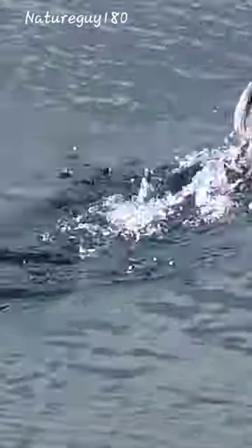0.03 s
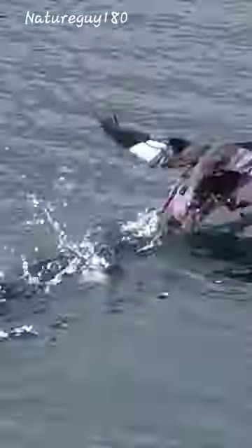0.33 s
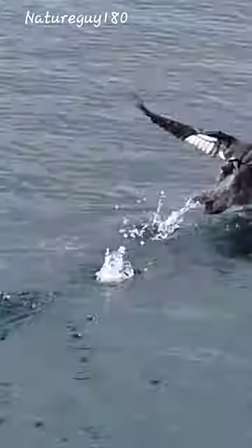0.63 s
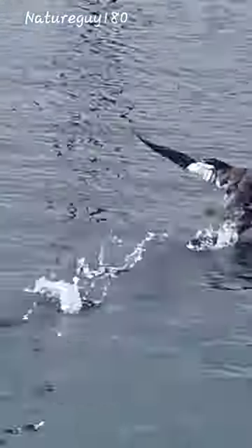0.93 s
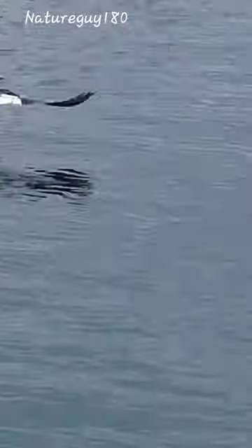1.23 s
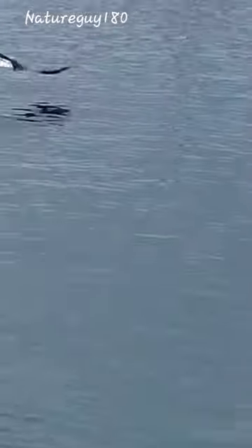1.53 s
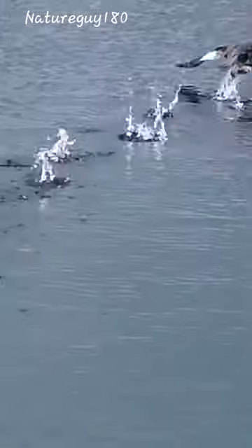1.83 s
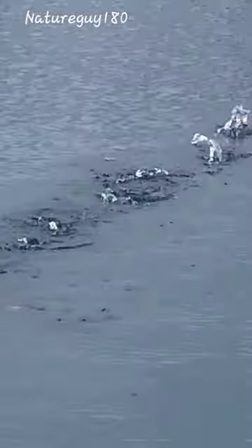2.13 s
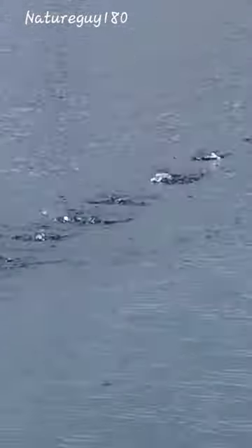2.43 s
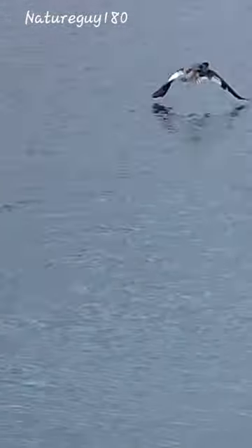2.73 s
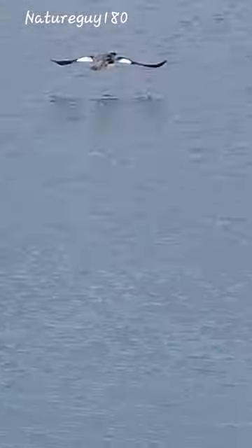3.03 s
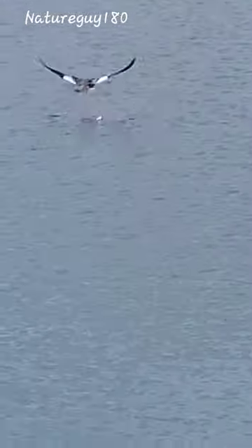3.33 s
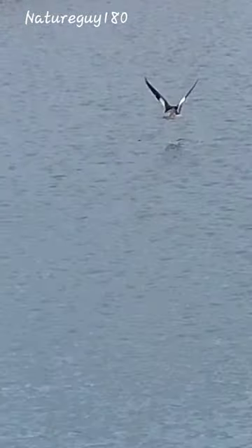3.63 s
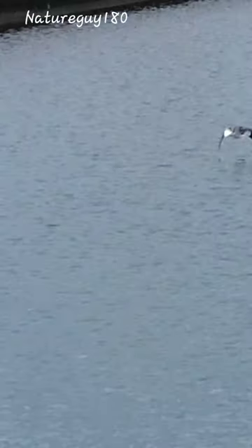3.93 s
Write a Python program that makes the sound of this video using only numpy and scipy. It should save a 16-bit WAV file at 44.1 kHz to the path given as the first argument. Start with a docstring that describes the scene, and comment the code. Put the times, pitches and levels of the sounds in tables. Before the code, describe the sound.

Sharp splashes of a duck running across water, fading, with light wind on the microphone.

```python
"""On a calm lake, a duck runs across the water to take off and fades as it flies away.
Its feet strike the surface in sharp cracks and plunge in, trapping air that rings as bubbles,
while spray patters down behind it. Far off, one whistling call, probably another water bird,
echoes from the banks. Turbulent wind buffets the microphone, mostly its right port,
over a distant rumble."""
import sys
import numpy as np
from scipy import signal
from scipy.fft import rfft, irfft, next_fast_len
from scipy.io import wavfile
from scipy.ndimage import uniform_filter1d, map_coordinates

SR = 44100
rng = np.random.default_rng(int(sys.argv[2]) if len(sys.argv) > 2 else 0)


def int16_out(signal):
    """Quantize to a 16-bit WAV file."""
    q = np.round(np.clip(np.atleast_2d(signal).T, -1, 1) * 32767)
    wavfile.write(sys.argv[1], SR, q.astype(np.int16))


N = 176400

# Spectrum of a sharp impact on water: frequency_hz, gain_db
IMPACT_SPECTRUM = [(1500, -18), (3000, 8), (5000, 5.5), (8000, 6), (9500, -15), (15500, -9)]
# Spectrum of spray and froth: frequency_hz, gain_db
SPRAY_SPECTRUM = [(300, 5.5), (800, 3), (1350, 4), (2000, 9), (3200, 1), (6000, -1), (7800, 0), (9200, -9),
                  (12000, -12), (15500, -9.5)]
# Left-right likeness of the splashes: frequency_hz, coherence
WATER_COHERENCE = [(500, 1), (4000, 0.19), (15000, 0.1)]
# Left-right likeness of sound from the shore: frequency_hz, coherence
SHORE_COHERENCE = [(200, 0.81), (700, 0.86)]


def amp(db):
    """Decibels to amplitude ratio."""
    return 10 ** (np.asarray(db) / 20)


def unit(x):
    """Normalisation to rms 1."""
    return x / np.sqrt(np.mean(x ** 2) + 1e-20)


def along(points, hz):
    """Interpolation of (frequency_hz, value) points on a logarithmic frequency axis."""
    knots_hz, values = np.transpose(points)
    return np.interp(np.log(hz + 1), np.log(knots_hz + 1), values)


def envelope(points):
    """Amplitude envelope through (time_s, level_db) points, linear in decibels."""
    time_s, level_db = np.transpose(points)
    return amp(np.interp(np.arange(N) / SR, time_s, level_db))


def wobble(knots_per_s):
    """Smooth random modulation: a spline through Gaussian values."""
    return map_coordinates(rng.standard_normal(4096), [np.arange(N) * knots_per_s / SR], mode="wrap")


def filtered(x, response):
    """Linear filtering: the spectrum is multiplied by a frequency response."""
    n = x.shape[-1]
    padded = next_fast_len(n + 4096)
    return irfft(rfft(x, padded) * response(np.fft.rfftfreq(padded, 1 / SR)), padded)[..., :n]


def coloured(x, spectrum):
    """Spectral shaping by (frequency_hz, gain_db) points, at rms 1."""
    return unit(filtered(x, lambda hz: amp(along(spectrum, hz))))


def noise(spectrum, samples=N):
    """Two independent channels of coloured Gaussian noise."""
    return coloured(rng.standard_normal((2, samples)), spectrum)


def spread(pair, coherence):
    """Mid-side mixing gives two independent signals a set left-right coherence."""
    angle = lambda hz: np.arccos(np.clip(along(coherence, hz), -1, 1)) / 2
    mid, side = filtered(pair, lambda hz: np.array([np.cos(angle(hz)), np.sin(angle(hz))]))
    return np.array([mid + side, mid - side])


def pan(left_over_right_db):
    """Constant-power panning by level difference."""
    return unit(amp(np.array([[left_over_right_db], [-left_over_right_db]]) / 2))


def add(track, start_s, sound):
    """Superposition of a sound on a track."""
    part = track[..., max(0, round(start_s * SR)):][..., :sound.shape[-1]]
    part += sound[..., :part.shape[-1]]


def background(hiss_db=-61):
    """Broadband noise: a largely coherent rumble from the far shore and a thin, incoherent hiss."""
    # Strength of the rumble: time_s, level_db
    shore_levels = [(1.4, -52.5), (1.8, -47.5), (2.5, -48.5), (3.35, -52.5)]
    # Spectra of the rumble and the hiss: frequency_hz, gain_db
    shore_spectrum = [(180, 2), (240, 7), (330, -2.5), (620, -1.5), (1200, -8.5), (1700, -19.5),
                      (6000, -88)]
    hiss_spectrum = [(4000, 0), (7800, -10), (9200, -20), (12500, -22), (15000, -15)]
    rumble = spread(noise(shore_spectrum), SHORE_COHERENCE)
    return envelope(shore_levels) * rumble + amp(hiss_db) * noise(hiss_spectrum)


def wind(sheltered_left_db=-15.5, breeze_body_db=-13, buffet_depth_db=3):
    """Turbulent pressure at the microphone: a breeze mostly on the right port, gusts on both."""
    # Strength of the breeze on the right port: time_s, level_db
    breeze_levels = [(0, -38.5), (1.46, -36.5), (1.85, -34), (2.3, -40), (2.55, -33), (3.24, -41),
                     (3.33, -34), (3.41, -43), (3.66, -34), (3.83, -34.5), (3.89, -46.5), (4, -31.5)]
    # Short gusts: time_s, nominal_length_s, relative_level_db, left_over_right_db, body_over_rumble_db
    gusts = [(0.546, 0.05, -27.5, 3.5, -13), (0.986, 0.085, -35, 4, -37), (2.003, 0.076, -38, 3, -9),
             (2.649, 0.086, -34, 2.5, -7), (2.754, 0.1, -33.5, -7, -6.5), (2.857, 0.065, -31.5, -4.5, -14),
             (3.139, 0.044, -35, -1, -8.5), (3.667, 0.042, -32.5, 1, -16)]
    # Spectra of the deep rumble and the body above it: frequency_hz, gain_db
    rumble_spectrum = [(20, -17), (62, 2), (100, -1), (250, -24.5), (1500, -92)]
    body_spectrum = [(60, -19), (140, 3), (240, 2.5), (350, -11), (1100, -27), (4000, -57)]
    gust_coherence = [(100, 0.49)]  # one point: the same at all frequencies
    buffeting = amp(buffet_depth_db * np.array([wobble(49.14), wobble(16)]))
    breeze = unit(buffeting * (noise(rumble_spectrum) + amp(breeze_body_db) * noise(body_spectrum)))
    out = envelope(breeze_levels) * amp([[sheltered_left_db], [0]]) * breeze
    for time_s, length_s, level_db, pan_db, body_db in gusts:
        swell = np.hanning(int(1.43 * length_s * SR))
        rumble, body = (unit(swell * spread(noise(spectrum, SR // 2), gust_coherence)[:, :len(swell)])
                        for spectrum in (rumble_spectrum, body_spectrum))
        gust = rumble + amp(body_db) * body
        add(out, time_s - length_s / 4, amp(level_db - 1.5) * pan(pan_db) * gust)
    return out


def far_call(pitch_hz=1111, echo_db=-9, echo_t60_s=2.4, scatter_hz=65):
    """Random modulation makes a whistle hoarse; diffuse reflection from the banks prolongs it."""
    # Strength of the whistle: time_s, level_db
    call_levels = [(1.585, -49.5), (1.62, -52), (1.634, -40.5), (1.695, -44), (1.72, -38), (1.765, -34),
                   (1.81, -42.5), (1.85, -49)]
    t = np.arange(N) / SR
    rasp = np.interp(t, [1.69, 1.71], [0.75, 0.3])  # hoarse at first, then clearer
    modulation = 1 - rasp + rasp * (wobble(230) + 1j * wobble(230))
    whistle = np.sqrt(2) * (modulation * np.exp(2j * np.pi * pitch_hz * t)).real
    sounding = (t > call_levels[0][0]) & (t < call_levels[-1][0])
    voice = whistle * envelope(call_levels) * sounding
    echo_decay = amp(-60 * t / echo_t60_s) * (1 - np.exp(-t / 0.01))
    reflections = spread(rng.standard_normal((2, N)), SHORE_COHERENCE) * echo_decay
    scattered = voice * (0.5 + wobble(scatter_hz) + wobble(4 * scatter_hz))
    echo = signal.fftconvolve(scattered[None], reflections, axes=1)[:, :N]
    return voice + amp(echo_db) * voice.std() * unit(echo)


def bubbles(length_s, centre_hz, per_s, level_range_db, octaves, decay_cycles=4.5, pitch_rise=0.11):
    """Bubble resonance: a cloud of damped oscillators, each rising in pitch as it rings."""
    count, t = int(per_s * length_s) + 2, np.arange(700) / SR
    draws = np.random.default_rng(rng.integers(2 ** 31)).random((count, 4))
    onset, pitch, strength, life = draws.T[:, :, None]
    hz = centre_hz * 2 ** (octaves * np.arcsin(2 * pitch - 1) * 2 / np.pi)
    age = hz * t / (decay_cycles * (0.5 + life))  # in decay time constants
    phase = 2 * np.pi * hz * t * (1 + pitch_rise * np.tanh(age))
    shape = np.exp(-age) * (1 - np.exp(-2 * hz * t))
    rings = amp(level_range_db * strength) * hz ** 0.25 * np.sin(phase) * shape
    positions = (onset * length_s * SR).astype(int) + np.arange(len(t))
    cloud = np.bincount(positions.ravel(), rings.ravel())
    return cloud * np.sqrt(length_s * SR / np.sum(cloud ** 2))


def spray(drops_per_s=900, drop_spread_db=3.5, mist_gain=0.93, wake_db=-3):
    """Shot noise of falling drops over a bubbling wake, fainter as the duck draws away."""
    # Strength of the falling spray: time_s, level_db
    spray_levels = [(0, -54), (.55, -53), (.9, -50.5), (1.42, -59), (1.7, -53.5), (2.25, -59), (2.5, -65.5),
                    (3, -77)]
    strengths = amp(drop_spread_db * np.minimum(rng.exponential(size=(2, N)), 4))
    signs = rng.choice([-1, 1], (2, N))
    landings = rng.random((2, N)) < drops_per_s / SR
    drops = coloured(strengths * signs * landings, SPRAY_SPECTRUM)
    mist = mist_gain * noise(SPRAY_SPECTRUM)
    patter = unit(spread(drops + mist, WATER_COHERENCE)) * amp(2.2 * wobble(45))
    wake = bubbles(N / SR, centre_hz=1100, per_s=130, level_range_db=28, octaves=2.237)
    add(patter, 0, amp(wake_db) * wake)
    return envelope(spray_levels) * patter


def drips(decay_s=0.002):
    """Impact transients: large drops land one by one, each a crisp, exponentially damped tick."""
    # Single large drops: start_s, level_db
    large_drops = [(.255, -45), (1.358, -44), (1.494, -43.5), (1.836, -41), (2.097, -45)]
    out, t = np.zeros((2, N)), np.arange(1024) / SR
    for start_s, level_db in large_drops:
        add(out, start_s, amp(level_db) * np.exp(-t / decay_s) * noise(IMPACT_SPECTRUM, len(t)))
    return spread(out, WATER_COHERENCE)


def plunges(froth_db=-13):
    """Air entrainment: feet and wing tips drag air under, making ringing bubbles and some froth."""
    # Clumps of bubbles: start_s, length_s, level_db, pitch_hz
    clumps = [(0.003, 0.022, -50.5, 1634), (.02, 0.41, -53, 399), (0.063, 0.011, -50.5, 1560),
              (0.072, 0.031, -46.5, 666), (0.38, 0.014, -49.5, 1600), (.404, .02, -48.5, 563),
              (0.407, 0.015, -44, 1640), (0.606, 0.027, -49, 2100), (0.674, 0.045, -52, 1990),
              (0.693, 0.0054, -42.5, 2480), (0.728, .014, -46.5, 890), (0.813, .038, -40.5, 1800),
              (0.879, 0.045, -48, 2140), (1.033, 0.073, -51, 1450), (1.891, 0.011, -43.5, 1930),
              (2.304, 0.0037, -49, 1870)]
    out = np.zeros((2, N))
    for start_s, length_s, level_db, pitch_hz in clumps:
        per_s = 1800 * amp(level_db + 48)  # the harder the plunge, the denser the clump
        octaves = 1.338 * min(1, length_s / 0.02)  # a brief dip makes a plip of nearly one pitch
        clump = bubbles(length_s, pitch_hz, per_s, level_range_db=22, octaves=octaves)
        add(out, start_s, amp(level_db) * clump)
        froth = noise(SPRAY_SPECTRUM, SR)[:, :int(length_s * SR * 1.4)]
        add(out, start_s, amp(level_db + froth_db) * froth * np.hanning(froth.shape[1]))
    return out


def slaps(rise_s=0.0026, decay_s=0.0026, spatter_s=0.017, spatter_db=-20.5):
    """Impact noise: each footfall bursts the surface with a gritty crack and a short spatter."""
    # Feet striking the water: start_s, relative_level_db, relative_body_db
    footfalls = [(0.189, -38, -15), (0.3364, -42, -3.5), (0.4834, -35.5, -10), (0.754, -35, -9.5),
                 (0.826, -34, -3.5), (.838, -44, 8.5), (0.9561, -44, 2.5), (1.020, -33, -15),
                 (1.1504, -34, -10.5), (1.288, -37.5, -7.5), (1.4238, -42, -4), (1.554, -43.5, -11),
                 (1.686, -43.5, -2), (1.7522, -42.5, -4), (1.8235, -45.5, -2.5), (2.122, -31.5, -41),
                 (2.244, -38.5, -20)]
    # Spectrum of the midrange body of a slap: frequency_hz, gain_db
    body_spectrum = [(250, -4), (700, -6), (2800, -4.5), (4200, -26)]
    slap_gain_db, body_gain_db, grit_depth_db = 4.5, 9, 3
    out, t = np.zeros((2, N)), np.arange(4096) / SR
    attack = 1 - np.exp(-(t / rise_s) ** 2)
    shape = attack * (np.exp(-t / decay_s) + amp(spatter_db) * np.exp(-t / spatter_s))
    for start_s, level_db, body_db in footfalls:
        grit = amp(grit_depth_db * unit(uniform_filter1d(rng.standard_normal(len(t)), size=24)))
        burst = unit(shape * grit) * np.sqrt(np.mean(shape ** 2))  # roughened at equal energy
        crack = noise(IMPACT_SPECTRUM, len(t))
        body = amp(body_db + body_gain_db) * noise(body_spectrum, len(t))
        add(out, start_s, amp(level_db + slap_gain_db) * burst * (crack + body))
    return spread(out, WATER_COHERENCE)


def propagation(splashes, right_lag_s=0.00011, treble_hz=10300, fade_db_per_s=2.5):
    """Path difference brings the sound to the left port first; its top treble fades with distance."""
    # Level difference between the ports: frequency_hz, left_over_right_db
    balance = [(1000, 0.5), (2200, -2), (5000, 1), (13000, -3)]
    left = lambda hz: np.exp(1j * np.pi * hz * right_lag_s) * amp(along(balance, hz) / 2)
    arriving = filtered(splashes, lambda hz: np.array([left(hz), 1 / left(hz)]))
    treble = filtered(arriving, lambda hz: 1 - 1 / (1 + (hz / treble_hz) ** 10))
    treble_gain = amp(-fade_db_per_s * (np.arange(N) / SR - 1.5))  # unity at 1.5 s
    return arriving + treble * (treble_gain - 1)


def scene():
    """Superposition of the duck's splashes, the far call, the wind and the background."""
    splashes = slaps() + drips() + plunges() + spray()
    return propagation(splashes) + far_call() + wind() + background()


def record(dry):
    """Band limiting: an ideal low-pass filter at 16 kHz."""
    return filtered(dry, lambda hz: hz < 16000)


dry = scene()
out = record(dry)
int16_out(out)
```